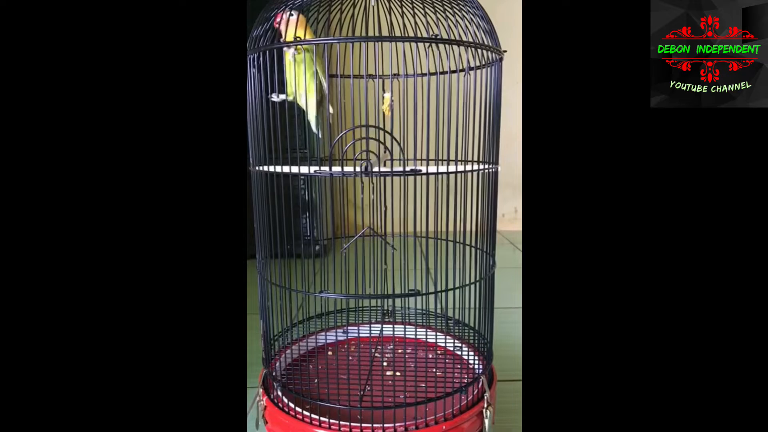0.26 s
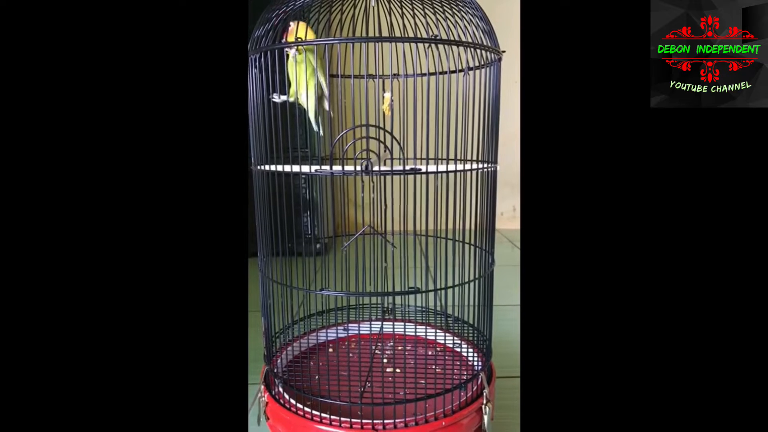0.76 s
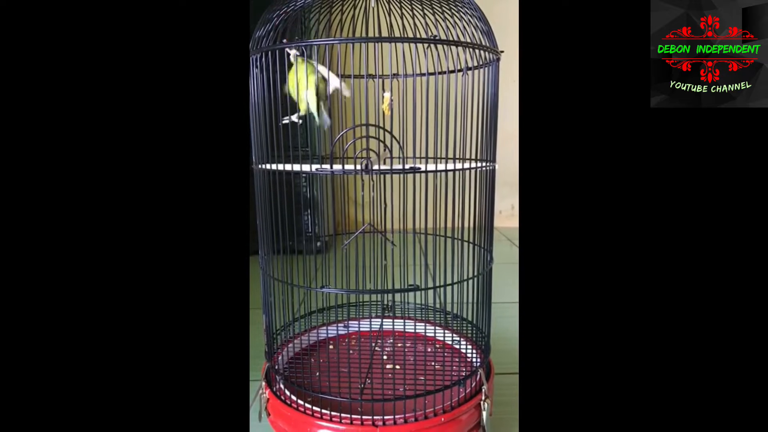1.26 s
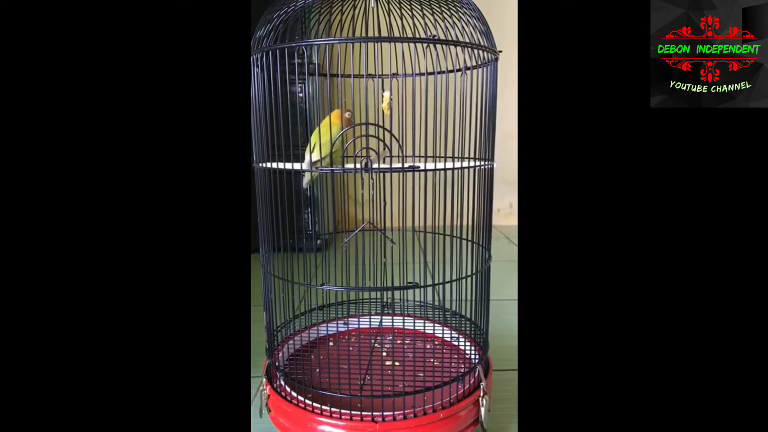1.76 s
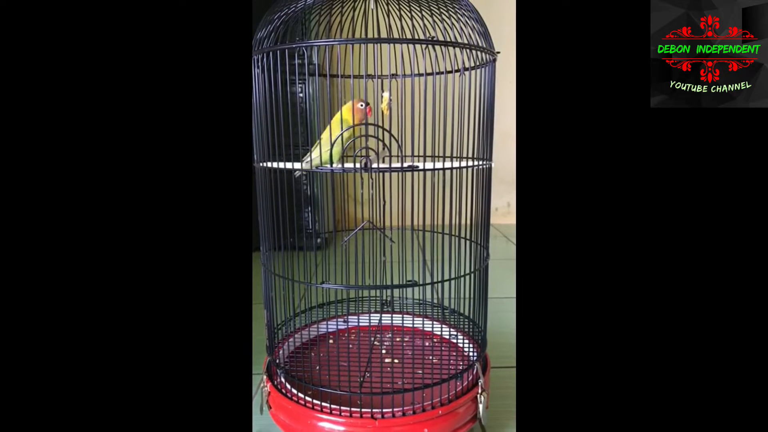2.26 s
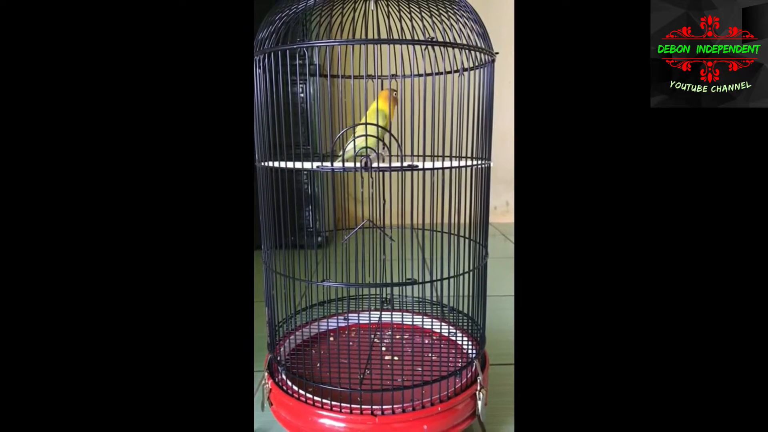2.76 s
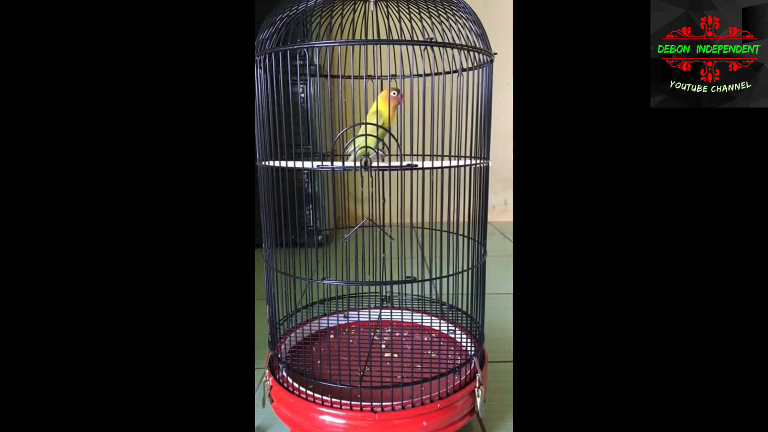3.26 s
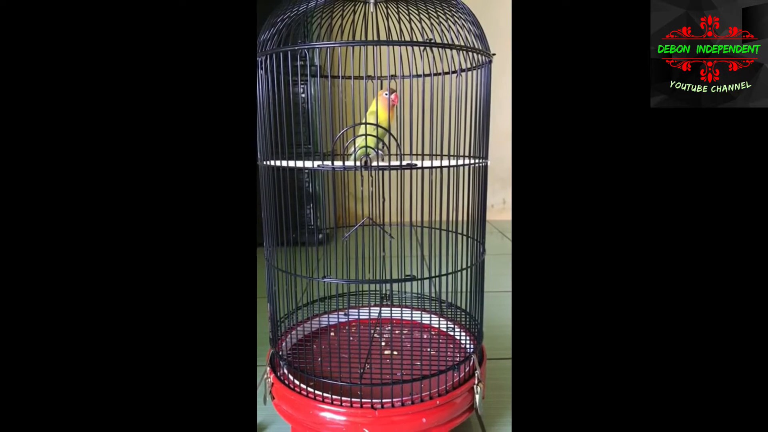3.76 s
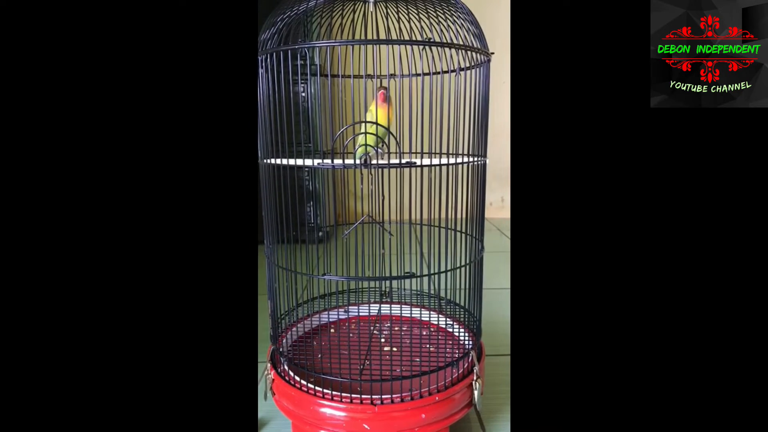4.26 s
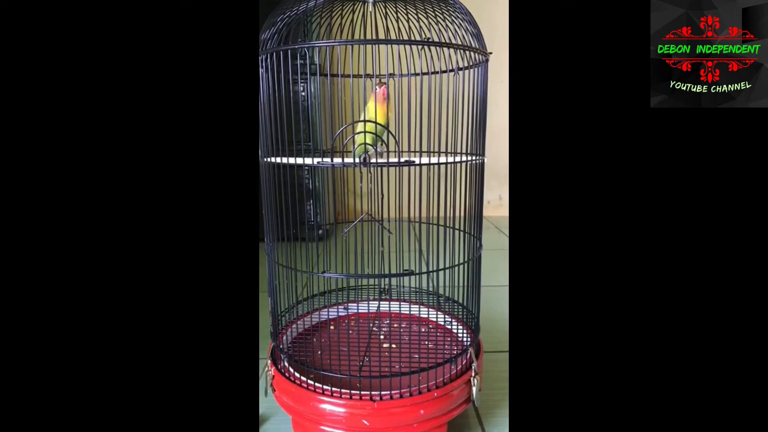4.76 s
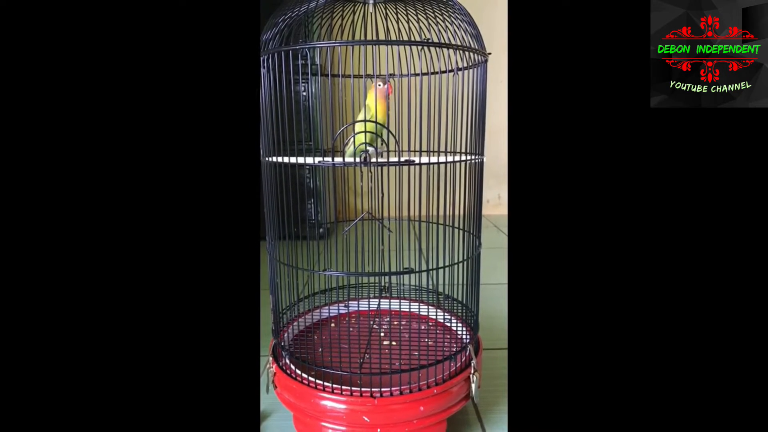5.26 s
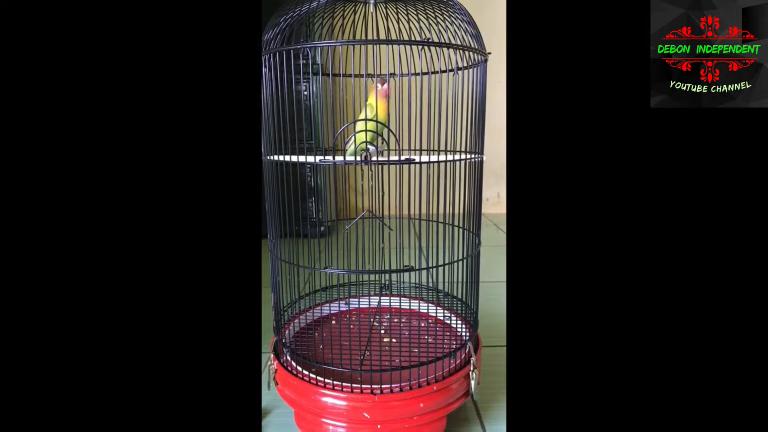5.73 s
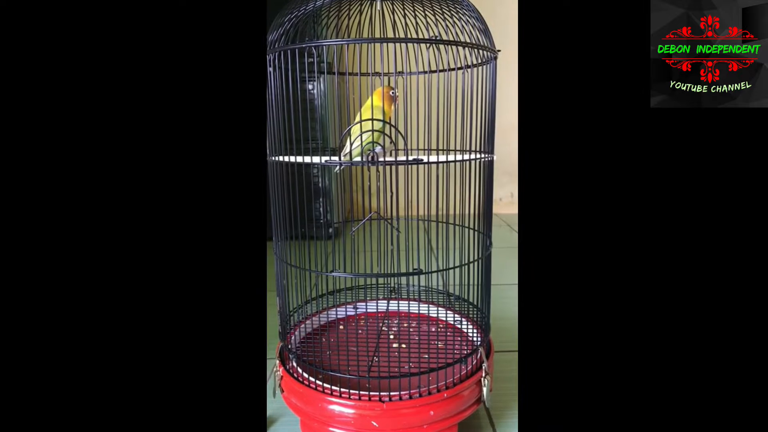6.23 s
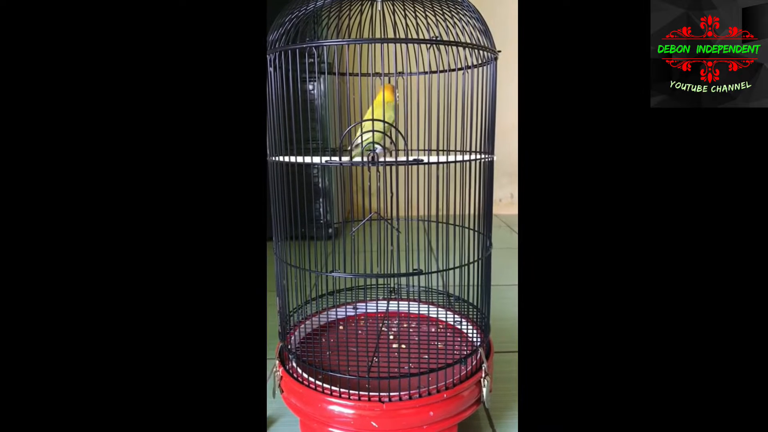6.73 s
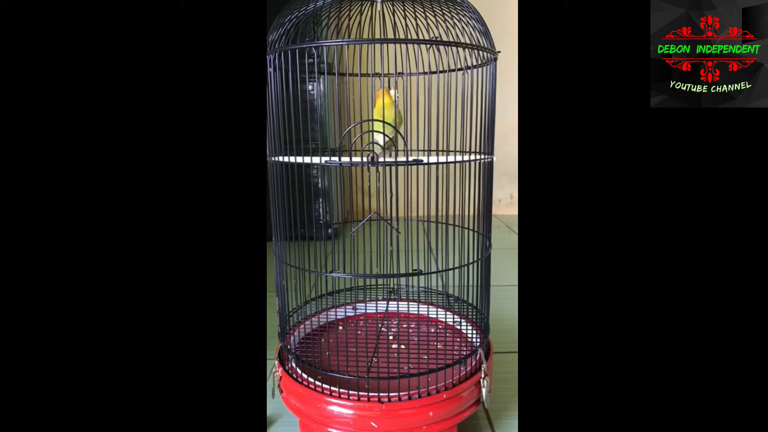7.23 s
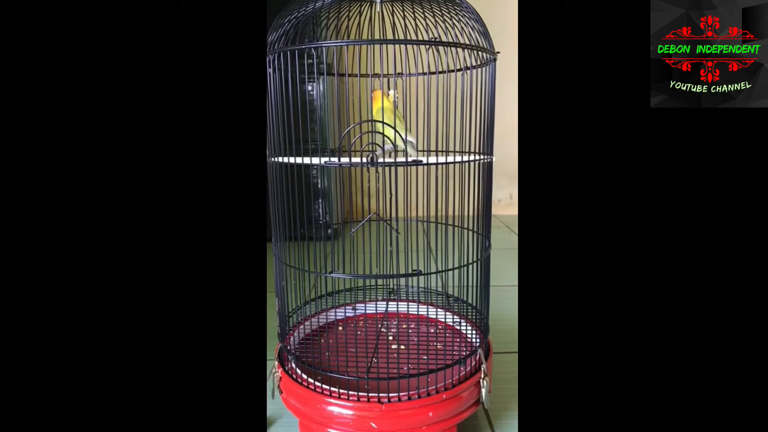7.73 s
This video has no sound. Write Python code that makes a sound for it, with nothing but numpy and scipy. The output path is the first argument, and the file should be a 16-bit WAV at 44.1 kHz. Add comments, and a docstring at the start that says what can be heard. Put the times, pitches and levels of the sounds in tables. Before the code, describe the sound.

Rapid lovebird trilling in an echoing tiled room eases into dry ticking, swells into bright calls, cuts briefly, then gives sparse piercing cheeps above low hum.

```python
"""A caged lovebird chatters in a tiled room: a trill of arched chirps, soft double ticks, louder calls,
and after a short dropout five shrill cheeps and a far bird's call. Traffic hums through the walls.
Bird notes are overtones on pitch curves, shaped by a throat and sent through echoes and a ringing tail.
Traffic is coloured noise with fuzzy drones, hiss is coloured noise, and claw taps are dying sines."""
import sys
import numpy as np
from scipy import signal
from scipy.fft import rfft, irfft, next_fast_len
from scipy.io import wavfile
from scipy.ndimage import uniform_filter1d

SR = 44100
rng = np.random.default_rng(int(sys.argv[2]) if len(sys.argv) > 2 else 0)


def to_wav(sig):
    """Store sig (one row per channel, or 1-D mono) as 16-bit WAV at the path in sys.argv[1].

    Samples outside -1..1 are clipped; the rate is SR.
    """
    pcm = np.clip(np.atleast_2d(sig), -1, 1) * 32767
    pcm = np.round(pcm).astype(np.int16)
    wavfile.write(sys.argv[1], SR, pcm.T)  # frames by channels


N = 352359

# the short silence: (start [s], end [s])
DROPOUT = (5.8295, 5.8995)


def gain_of(db):
    """Turns decibels into amplitude."""
    return 10 ** (np.asarray(db) / 20)


def evened(x):
    """Scales a sound to an average (rms) level of 1."""
    return x / np.sqrt(np.mean(x ** 2) + 1e-20)


def read(points, hz):
    """Reads a curve of (frequency, value) points along a log frequency axis."""
    f, value = np.transpose(points)
    return np.interp(np.log(hz + 1), np.log(f + 1), value)


def follow(tables, axis):
    """Joins tables that start with time and draws one column sample by sample."""
    rows = np.concatenate(tables)
    return np.interp(np.arange(N) / SR, rows[:, 0], rows[:, axis])


def add(mix, s, sound):
    """Mixes a sound in at s seconds."""
    part = mix[round(s * SR):][:len(sound)]
    part += sound[:len(part)]


def shaped_noise(size, gains):
    """Random noise with each frequency scaled by its gain."""
    return irfft(rfft(rng.standard_normal(size)) * gains, size)


def flutter(count, rate_hz):
    """Smooth random wavering, about rms 1: noise without its fast part."""
    size = next_fast_len(count + 2000)
    slow_part = np.exp(-(np.fft.rfftfreq(size, 1 / SR) / rate_hz) ** 2)
    return evened(shaped_noise(size, slow_part))[:count]


def coloured(points):
    """Steady noise with the given spectrum."""
    size = next_fast_len(N)
    gains = gain_of(read(points, np.fft.rfftfreq(size, 1 / SR)))
    return evened(shaped_noise(size, gains)[:N])


def narrow(hz, width_hz, steady=1.2):
    """A fuzzy tone: slow two-part noise carried on a pitch curve, around a steady core."""
    turn = np.exp(2j * np.pi * np.cumsum(hz * np.ones(N)) / SR)
    fuzz = flutter(N, width_hz) + 1j * flutter(N, width_hz)
    return evened((turn * (steady + fuzz)).real)


def traffic():
    """Low rumble with wavering engine drones."""
    # spectrum of the rumble: (frequency [Hz], level per Hz [dB])
    rumble_spectrum = [(15, -73.5), (25, -35), (34, -21), (41, -9), (65, -0.5), (128, -1), (220, -11),
                       (257, -12.5), (354, -20), (700, -39), (910, -91.5), (1540, -120)]
    # loudness of rumble and upper drones, in two parts: (time [s], level [dB])
    rumble_levels = [
        [(0.0, -46), (0.26, -44.5), (2.87, -42), (3.15, -42), (5.7, -40.5), (5.83, -35)],
        [(5.9, -36), (7.92, -38), (7.99, -39.5)],
    ]
    # lowest drone, in two parts: (time [s], pitch [Hz], level [dB])
    engine = [
        [(0.0, 54.8, -37.5), (0.63, 54.7, -44), (0.86, 70.1, -45.5), (1.44, 57.0, -40), (2.84, 54, -46),
         (2.95, 65.6, -41), (3.38, 69.6, -46.5), (3.56, 63.9, -44.5), (5.83, 67.5, -42.5)],
        [(5.9, 64.1, -35), (6.11, 63.9, -36), (7.16, 61.7, -38), (7.99, 70, -58)],
    ]
    # upper drones: (pitch [Hz], width [Hz], level against the rumble [dB])
    upper_drones = [(93.9, 6.2, -2.5), (108.4, 3.9, -7.5), (141.5, 8.2, -9.5), (166.4, 3.6, -13.5),
                    (218.6, 2.7, -14)]
    drones = np.zeros(N)
    for hz, width_hz, db in upper_drones:
        level = gain_of(db + 1.2 * flutter(N, 1.0))
        pitch_hz = hz * (1 + .025 * flutter(N, .3))
        drones += level * narrow(pitch_hz, width_hz)
    hum = evened(gain_of(-1.5) * coloured(rumble_spectrum) + drones)
    lowest = gain_of(follow(engine, axis=2)) * narrow(follow(engine, axis=1), 2.3, steady=2.4)
    return gain_of(follow(rumble_levels, axis=1)) * hum + lowest


def air():
    """Faint wavering room hiss, a little louder from the dropout on."""
    # spectrum of the hiss: (frequency [Hz], level per Hz [dB])
    hiss_spectrum = [(240, -33.5), (400, -11), (528, -12), (567, -11), (1180, -8.5), (1510, -9.5),
                     (1870, -15.5), (2260, -14.5), (9440, -29), (13000, -55)]
    # (level before the dropout [dB], level after it [dB])
    hiss_levels = [-60, -57]
    level_db = np.where(np.arange(N) / SR < DROPOUT[0], *hiss_levels)
    return gain_of(level_db + 1.2 * flutter(N, 3)) * coloured(hiss_spectrum)


def room(x):
    """Wall echoes, then a dense ringing that builds up and dies at its own speed in each band."""
    # dying time: (frequency [Hz], time to fall by 60 dB [s])
    ring_times = [(1500, 0.55), (3960, 0.51), (10400, 0.43)]
    # first wall echoes: (delay [s], level [dB])
    wall_echoes = [(.0021, -9), (.0047, -10.5), (.0083, -11.5), (0.0124, -16), (0.021, -12), (0.027, -26.5),
                   (0.035, -11.5), (0.053, -18)]
    taps = np.zeros(SR)
    # one tap somewhere in every 20 samples, of random sign
    at = np.arange(100, SR - 20, 20) + rng.integers(0, 20, (SR - 101) // 20)
    build_up = 1 - np.exp(-(at / SR / 0.003) ** 2)
    taps[at] = rng.choice([-1., 1.], len(at)) * build_up
    hz, t, bands = signal.stft(taps, SR, nperseg=128)
    decay = gain_of(-60 * t / read(ring_times, hz)[:, None])
    tail = signal.istft(bands * decay, SR, nperseg=128)[1]
    tail = tail / np.linalg.norm(tail)
    for s, db in wall_echoes:
        add(tail, s, gain_of([db]))
    return signal.fftconvolve(x, tail)[:len(x)]


def voice(rows, wobble=0.2, throb=1.0, rasp=0.23, cut=0.83):
    """The syrinx buzzes with overtones shaped by the throat; roughness shakes pitch and level and adds rasp.

    Rows: (time [s], pitch [Hz], level [dB], overtone slope [dB per harmonic], roughness [0-1]).
    wobble is the pitch shake as a share of the pitch, at full roughness."""
    # colour of the overtones, with a dip near 10.4 kHz and a peak near 11.5 kHz: (frequency [Hz], level [dB])
    tone_colour = [(1200, -18.5), (2000, -21.5), (3000, -9.5), (4200, -4.5), (6200, 2.5), (7500, -5), (9300, 1),
                   (10400, -7), (11500, 8), (13000, -16.5)]
    throb_hz = 480  # how fast the level of a rough note shakes
    s, *columns = np.transpose(rows)
    t = np.arange(s[0], s[-1], 1 / SR)
    hz, db, slope_db, rough = (np.interp(t, s, c) for c in columns)
    drift = flutter(len(t), 500) + 0.63 * flutter(len(t), 1900)
    turns = np.cumsum(hz * (1 + wobble * rough * (drift - drift.mean()))) / SR
    k = np.arange(1, 10)[:, None]  # harmonic numbers
    share = gain_of(slope_db * (k - 1) + read(tone_colour, k * hz)) * (k * hz < .32 * SR)
    share = share / np.sqrt((share ** 2).sum(0) / 2)
    tone = (share * np.cos(2 * np.pi * k * turns)).sum(0)
    shake = 1 + throb * rough * flutter(len(t), throb_hz) + rasp * rough * flutter(len(t), 2200)
    soft_ends = signal.windows.tukey(len(t), min(1, 0.0015 * SR / len(t)))
    note = gain_of(db) * tone * evened(shake) * soft_ends
    # the beak lets out little below the lowest pitch
    beak = signal.butter(8, cut * hz.min(), "high", fs=SR, output="sos")
    return s[0], signal.sosfilt(beak, note)


def arch(s, db, top_hz, lead_s, length, turn_db):
    """A soft flat buzzy note, then a raspy chirp that sweeps up, turns over and falls steeply."""
    foot_hz, end_hz, rise_share = 2286, 3153, .4
    u = np.linspace(-1, 1, 11)  # -1 at the foot, 0 at the top, 1 at the end
    rising = u < 0
    t = s + u * length * np.where(rising, rise_share, 1 - rise_share)
    hz = top_hz - abs(u) ** 1.75 * (top_hz - np.where(rising, foot_hz, end_hz))
    turn_over = turn_db * np.exp(-(u / 0.27) ** 2)
    level_db = db - np.where(rising, 3, 1.5) * u ** 4 + turn_over
    slope_db = -21 + np.where(rising, 13, 3) * u ** 2
    rows = np.transpose([t, hz, level_db, slope_db, 0.39 + 0 * u])
    lead = [(t[0] - before, foot_hz, db - 10.5, -10, .3) for before in (lead_s, .001)]
    trail = (t[-1] + .005, 0.877 * end_hz, db - 8.5, -5, .5)
    return voice(np.vstack([lead, rows, trail]), wobble=0.099, throb=1.36, rasp=0.13, cut=.92)


def buzz(s, db, length, start_hz, end_hz, rough, slope_db):
    """A quick swelling and dying buzz, rich in overtones."""
    rows = [(s, start_hz, db - 3, slope_db - 2.5, rough + 0.18),
            (s + 0.48 * length, (start_hz + end_hz) / 2, db, slope_db, rough),
            (s + length, end_hz, db - 8.5, slope_db, rough)]
    return voice(rows, wobble=0.12, cut=0.94)


def tick(s, db, length, start_hz, end_hz):
    """A short buzz: flat ticks are clear, fast glides are rough."""
    clear, gliding = 0.08, 0.49  # roughness [0-1]
    fast_hz_per_s = 86000
    speed = min(abs(end_hz - start_hz) / length / fast_hz_per_s, 1)
    return buzz(s, db, length, start_hz, end_hz, clear + speed * (gliding - clear), slope_db=-6)


def cluck(s, db, length):
    """A low rough buzz that climbs a little."""
    low_hz, climb_hz = 1361, 170
    return buzz(s, db, length, low_hz, low_hz + climb_hz, rough=0.47, slope_db=-3.5)


def slide(*rows):
    """A call on a drawn pitch curve: opens rough and clears; lower pitch has richer overtones."""
    s, hz, db = np.transpose(rows)
    clears_s = 0.0048
    rough = 0.038 + .45 * np.exp(-(s - s[0]) / clears_s)
    slope_db = -5 - 4 * (hz / 1000 - 2)  # 4 dB steeper for each kHz
    return voice(np.transpose([s, hz, db, slope_db, rough]))


def step(s, db, low_hz, low_s, shelf_hz, shelf_s, flick_hz, last_hz, flick_s):
    """A soft low note climbs to a pure swelling shelf, flicks up and settles."""
    # low note (2 rows), shelf (3), flick (3):
    # (level against the call [dB], overtone slope [dB per harmonic], roughness [0-1])
    step_stages = [(-17.5, -5.5, 0.24), (-15, -21.5, .2), (-7, -14, .1), (-2, -17.5, 0.06), (2.5, -21, 0),
                   (-4.5, -16, .15), (-3, -12, .08), (-9.5, -9.5, .1)]
    climb_s, shelf_creep = .007, 1.06  # the pitch creeps up along the shelf
    waits = [0, low_s, climb_s, .4 * shelf_s, .6 * shelf_s, .002, 0.39 * flick_s, .6 * flick_s]
    t = s + np.cumsum(waits)
    settling_hz = last_hz + 0.33 * (flick_hz - last_hz)
    hz = [low_hz, 1.07 * low_hz, shelf_hz, shelf_hz, shelf_creep * shelf_hz,
          flick_hz, settling_hz, last_hz]
    stage_db, slope_db, rough = np.transpose(step_stages)
    return voice(np.transpose([t, hz, db + stage_db, slope_db, rough]))


def yodel(s, db, leap_hz, held_hz, held_s, held_db):
    """A rough, overtone-rich climb breaks, leaps up and settles on a purer held note."""
    # climb (3 rows), break (1), leap (2), held note (3):
    # (level against the call [dB], overtone slope [dB per harmonic], roughness [0-1])
    yodel_stages = [(-9, 0, 0.29), (-8, -8, .3), (-2, -3, 0.43), (-0.5, -5, 0.33), (0.5, -16, 0.4),
                    (-2, -14.5, .25), (-3.5, -10.5, .15), (1, -16.5, 0.14), (-3.5, -16, .2)]
    low_hz, top_hz, break_hz = 2270, 3575, 2920
    climb_s, drop_s, settle_s = .007, 0.0029, 0.0048
    waits = [0, .003, climb_s - .003, drop_s, .001, .4 * settle_s, .6 * settle_s,
             .6 * held_s, .4 * held_s]
    t = s + np.cumsum(waits)
    settling_hz = held_hz + 0.28 * (leap_hz - held_hz)
    hz = [low_hz, low_hz, top_hz, break_hz, leap_hz, settling_hz, held_hz, held_hz,
          0.93 * held_hz]  # the held note sags at its end
    stage_db, slope_db, rough = np.transpose(yodel_stages)
    level_db = db + stage_db + held_db * (t > t[-3])
    return voice(np.transpose([t, hz, level_db, slope_db, rough]))


def cage_taps():
    """Claws on the bars: tiny dry clicks, each a sine that dies by 60 dB in 4 ms."""
    # (time [s], level [dB], pitch [Hz])
    claw_taps = [(6.193, -36, 1910), (6.381, -30.5, 1500), (6.822, -30, 1320)]
    out = np.zeros(N)
    t = np.arange(200) / SR
    for s, db, hz in claw_taps:
        add(out, s, gain_of(db - 60 * t / .004) * np.sin(2 * np.pi * hz * t))
    return out


def far_bird():
    """Another bird's soft call, one voice on a falling and wavering pitch curve."""
    # (time [s], pitch [Hz], level [dB])
    far_curve = [(6.335, 3195, -55.5), (6.37, 3086, -50.5), (6.4, 2957, -52), (6.445, 3060, -64),
                 (6.47, 2990, -65)]
    slope_db, rough = -10.5, 0.12
    return voice([(*row, slope_db, rough) for row in far_curve])


def whistle(s, length, db, start_hz, end_hz, warble_hz, slope_db):
    """One side of the syrinx: a near sine with a fast warble."""
    t = np.arange(s, s + length, 1 / SR)
    u = (t - s) / length
    hz = start_hz + (end_hz - start_hz) * u + warble_hz * np.tanh(flutter(len(t), 208))
    level_db = db + np.interp(u, [0, .2, .85, 1], [-16.0, 3, 3.5, -12])
    rows = np.transpose([t, hz, level_db, 0 * u + slope_db, 0 * u + .35])
    return voice(rows, wobble=.004, throb=1.3, rasp=.004, cut=.97)[1]


def cheep(s, length, upper_db, upper_hz, upper_end_hz, lower_db, lower_hz, lower_end_hz, late=.005):
    """Both sides of the syrinx whistle and beat, the lower one entering late; a click opens the note."""
    click_db, warble_hz = -37.5, 410
    click = [(s, 2200, click_db, -1.5, .3), (s + 0.0057, 2400, click_db + 0.5, -1.5, .3),
             (s + 0.0054, 2550, click_db - 6.5, -20, .2),
             (s + length + late, 2550, click_db - 41.0, -20, .2)]
    out = voice(click)[1]
    upper = whistle(s, length, upper_db, upper_hz, upper_end_hz, warble_hz, -26.0)
    lower = whistle(s, length - late, lower_db, lower_hz, lower_end_hz, 0.536 * warble_hz, -21)
    add(out, 0, upper[:len(out)])
    add(out, late, lower)
    return s, out


def lovebird():
    """All bird notes, direct and through the room, starting early so the room already rings at time zero."""
    # arched chirps: (time of the top [s], level [dB], top pitch [Hz], flat opening note [s],
    # arch length [s], extra level at the turn-over [dB])
    trill = [(0.039, -9.5, 5020, 0.0059, 0.014, -3.5), (0.119, -9.5, 5396, 0.0065, 0.013, -5),
             (0.197, -15.5, 5650, 0.0041, 0.016, -8), (0.276, -14.5, 5020, 0.0032, 0.012, 6.5),
             (0.36, -11.5, 4830, 0.0047, .014, 2.5), (0.442, -13, 5230, .005, .0129, 4),
             (0.524, -12, 5064, 0.0048, 0.015, -2), (0.608, -12.5, 5450, 0.0065, 0.016, -4),
             (0.694, -14, 5500, 0.0061, .0157, -2), (0.78, -14.5, 4650, 0.0057, .016, 1.5),
             (0.866, -11.5, 5026, 0.0079, 0.015, -4), (0.951, -14.5, 5010, 0.007, 0.013, -5.5),
             (1.037, -14, 4700, .009, .0155, -5.5), (1.119, -13.5, 4970, 0.0081, 0.014, -6),
             (1.209, -11.5, 5670, 0.0057, 0.014, -9), (1.295, -13.2, 4840, 0.0053, 0.017, -3.5),
             (1.387, -14, 5040, 0.0066, 0.02, -8), (1.482, -16.5, 4880, 0.0073, 0.017, -11.5),
             (1.582, -12.5, 5370, 0.014, 0.017, -12.5)]
    # short buzzy ticks: (time [s], level [dB], length [s], start pitch [Hz], end pitch [Hz])
    ticks = [(1.6667, -26.5, 0.014, 2397, 2000), (1.752, -24.5, 0.0066, 2010, 1960),
             (1.8326, -22.5, .0073, 2040, 2014), (1.9188, -19.5, 0.0076, 2050, 2070),
             (2.0066, -19.5, 0.0067, 1967, 1964), (2.092, -18.5, 0.0082, 1965, 1976),
             (2.179, -23.5, 0.0054, 1940, 1944), (2.263, -18, 0.0068, 2046, 2160),
             (2.3553, -18.5, 0.0033, 2070, 1896), (2.4463, -18.5, 0.0044, 2690, 3310),
             (2.5312, -19.5, .006, 2480, 3220), (2.62, -29.5, 0.004, 2270, 2850),
             (2.7103, -14.5, 0.006, 2684, 3490), (2.8082, -16, 0.0043, 2400, 3440),
             (2.961, -25.5, 0.0041, 1840, 1770), (2.989, -26, 0.011, 2010, 2170),
             (3.0736, -22.5, 0.015, 2090, 2070), (3.1552, -19, 0.0078, 1974, 2130),
             (3.2142, -20, .0069, 1627, 1690), (3.2473, -19.5, 0.0064, 2040, 2156),
             (3.339, -23.5, 0.0062, 1990, 1920), (3.424, -22, 0.004, 2060, 2000),
             (3.519, -26.5, 0.0032, 2080, 2600), (3.608, -23, 0.0055, 2050, 2690),
             (3.709, -27.5, 0.0057, 2753, 3287), (3.8035, -20, 0.0038, 1850, 2400),
             (3.897, -29, 0.0033, 2330, 2900), (3.9953, -23.5, 0.0053, 1990, 2500)]
    # soft low clucks between the ticks: (time [s], level [dB], length [s])
    clucks = [(1.717, -34.5, .011), (1.801, -29, 0.0047), (1.887, -30, 0.0086), (1.972, -35, 0.009),
              (2.044, -37, 0.0084), (2.14, -35.5, .0056), (2.229, -41, .0056), (2.312, -34.5, 0.0053),
              (2.585, -37, 0.0076), (2.866, -33, 0.0061), (3.04, -29.5, 0.014), (3.125, -27.5, 0.0058),
              (3.303, -29, 0.0081), (3.374, -31, 0.0041), (3.481, -37, .0044), (3.576, -32, .0028),
              (3.763, -34, 0.0038), (3.958, -31.5, .0038)]
    # falling calls, one curve each: (time [s], pitch [Hz], level [dB])
    slides = [
        [(4.08, 3880, -19), (4.084, 2930, -11.5), (4.089, 2430, -30), (4.097, 2123, -14.5), (4.101, 1970, -9.5),
         (4.107, 2010, -16), (4.118, 1840, -31.5)],
        [(4.184, 2210, -35.5), (4.188, 2120, -17), (4.196, 1860, -22.5), (4.202, 1813, -18), (4.212, 1730, -39)],
        [(4.273, 3410, -15), (4.279, 3296, -15.5), (4.288, 3100, -6.5), (4.296, 3093, -16),
         (4.305, 2883, -10.5), (4.311, 2495, -20), (4.313, 4610, -12.5), (4.325, 4640, -20.5)],
    ]
    # stepped whistles: (time [s], level [dB], low note [Hz], low note [s], shelf [Hz], shelf [s],
    # flick [Hz], last note [Hz], flick [s])
    steps = [(4.385, -11.5, 1810, 0.0057, 3625, .021, 3855, 3640, 0.0095),
             (4.496, -9.5, 2000, .007, 3686, 0.0072, 5110, 4450, 0.022),
             (4.602, -11, 1975, 0.01, 3825, 0.011, 5970, 4460, 0.0135)]
    # yodels: (time [s], level [dB], leap [Hz], held note [Hz], held note [s],
    # held note against the level [dB])
    yodels = [(4.713, -11.5, 4590, 4290, .008, -4.5), (4.812, -12.5, 5080, 4180, 0.01, -3.5),
              (4.919, -10.5, 5200, 4366, 0.013, -5.5), (5.029, -12, 5450, 4470, 0.013, 1),
              (5.14, -14, 4910, 4276, .015, -2.5)]
    # shrill two-voiced cheeps: (time [s], length [s], upper voice [dB], its start [Hz], its end [Hz],
    # lower voice [dB], its start [Hz], its end [Hz])
    cheeps = [(6.596, 0.038, -27.5, 6380, 6160, -18.5, 6210, 6140),
              (6.989, 0.038, -23.5, 6270, 6390, -16, 5840, 5486),
              (7.33, 0.03, -19, 6500, 6300, -15.5, 5690, 5243),
              (7.633, 0.036, -20.5, 6540, 6260, -14.5, 5350, 5750),
              (7.847, 0.029, -15, 6430, 6210, -18.5, 5090, 5880)]
    # room share as the bird moves and turns: (trill [dB], ticks [dB], cheeps [dB], calls [dB])
    room_shares = -2.5, -1.5, -3.5, -5
    trill_db, tick_db, cheep_db, call_db = room_shares
    early_s, period_s = .4, 0.068
    direct, sent = np.zeros((2, N + round(early_s * SR)))
    # the trill was already running at the start
    earlier = [(trill[0][0] - k * period_s, *trill[k][1:]) for k in range(1, 5)]
    kinds = ((arch, earlier + list(trill), trill_db), (tick, ticks, tick_db),
             (cluck, clucks, tick_db), (slide, slides, call_db), (step, steps, call_db),
             (yodel, yodels, call_db), (cheep, cheeps, cheep_db))
    for maker, table, room_db in kinds:
        for row in table:
            s, sound = maker(*row)
            add(direct, s + early_s, sound)
            add(sent, s + early_s, gain_of(room_db) * sound)
    s, far = far_bird()
    add(sent, s + early_s, far)  # the far bird arrives through the room only
    return (direct + room(sent))[-N:]


def scene():
    """Birds, traffic, hiss and cage taps together."""
    mix = lovebird() + traffic() + air() + cage_taps()
    return mix[None]


def record(dry):
    """Slow gain control lowers everything while the bird is loud; a short dropout; then a treble limit."""
    edge_hz = 12250
    t = np.arange(N) / SR
    # power averaged twice, each time over 12000 samples (0.27 s) around each moment
    power = uniform_filter1d(uniform_filter1d(dry[0] ** 2, 12000), 12000)
    power_db = 10 * np.log10(abs(power) + 1e-12)
    # 0.2 dB less for every dB above -25 dB
    gain = gain_of(-.2 * np.maximum(power_db + 25.0, 0))
    sounding = (t < DROPOUT[0]) | (t > DROPOUT[1])
    treble_limit = signal.firwin(121, edge_hz, window=("kaiser", 9), fs=SR)
    return signal.oaconvolve(dry * gain * sounding, treble_limit[None], "same")


dry = scene()
out = record(dry)
to_wav(out)
```